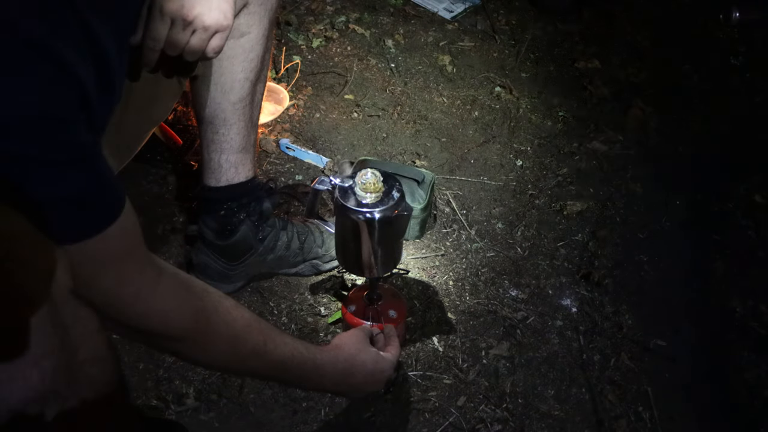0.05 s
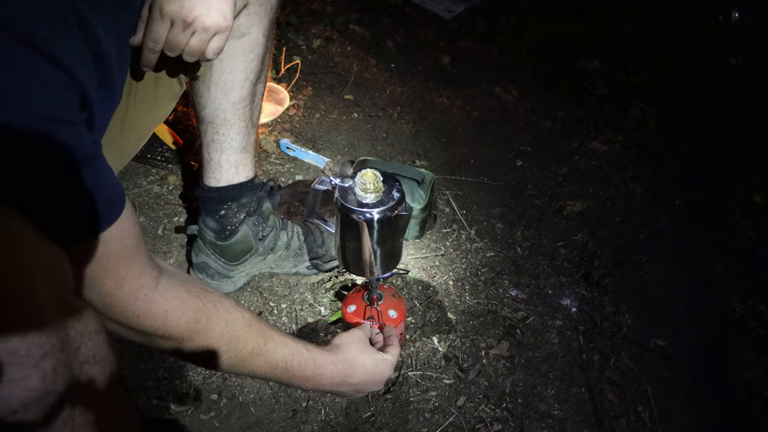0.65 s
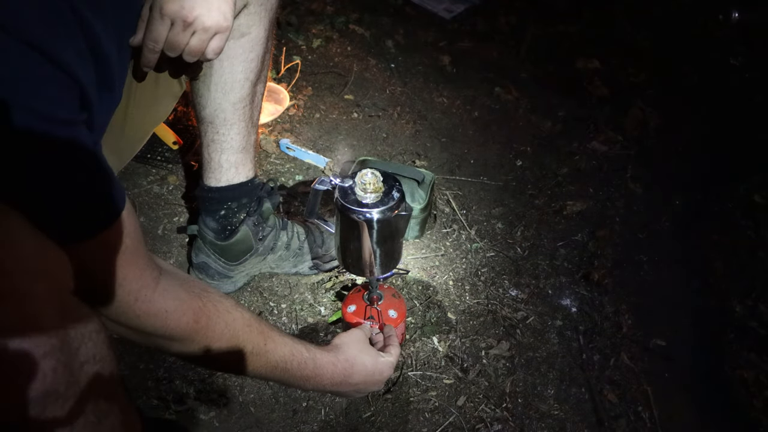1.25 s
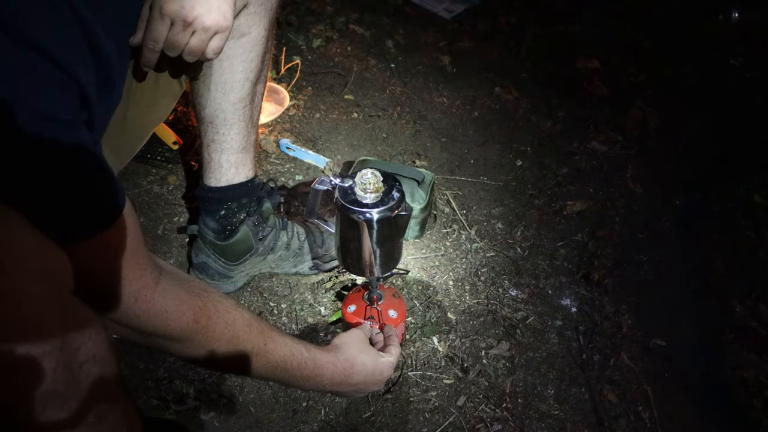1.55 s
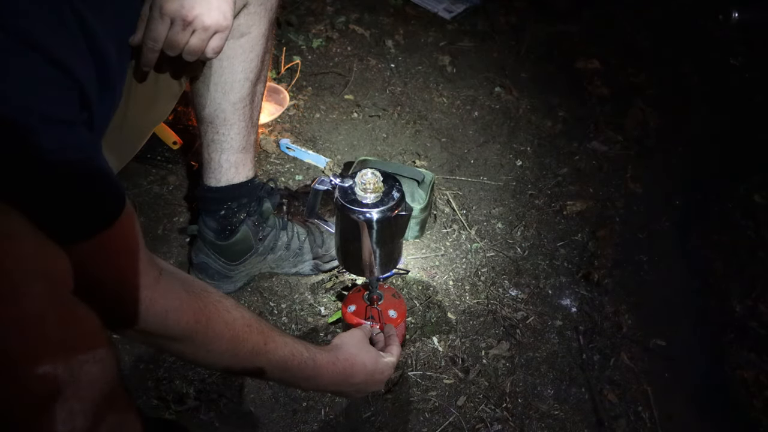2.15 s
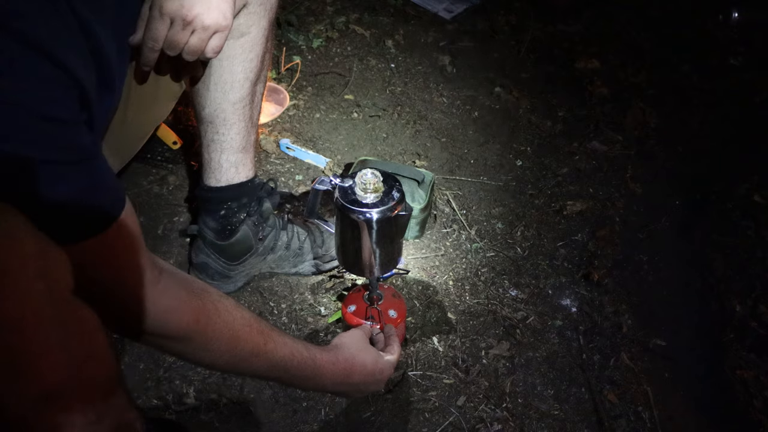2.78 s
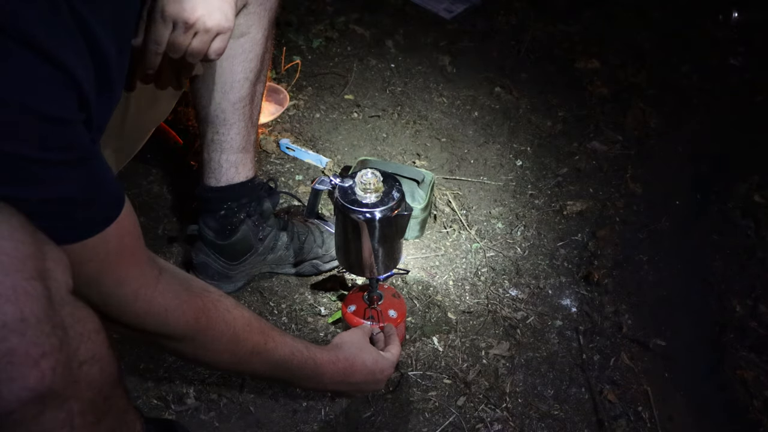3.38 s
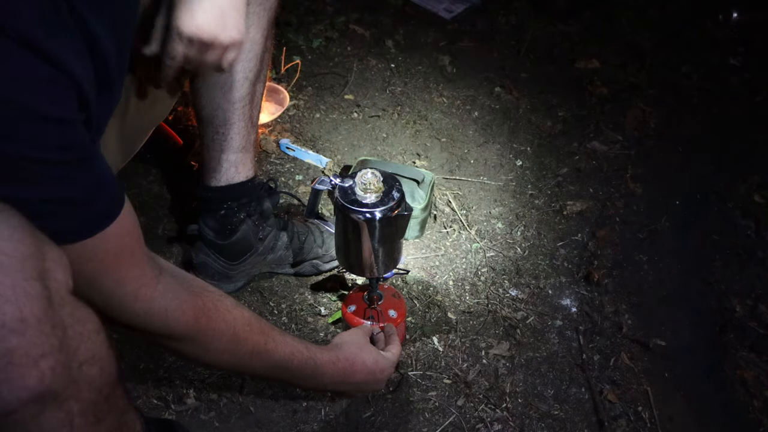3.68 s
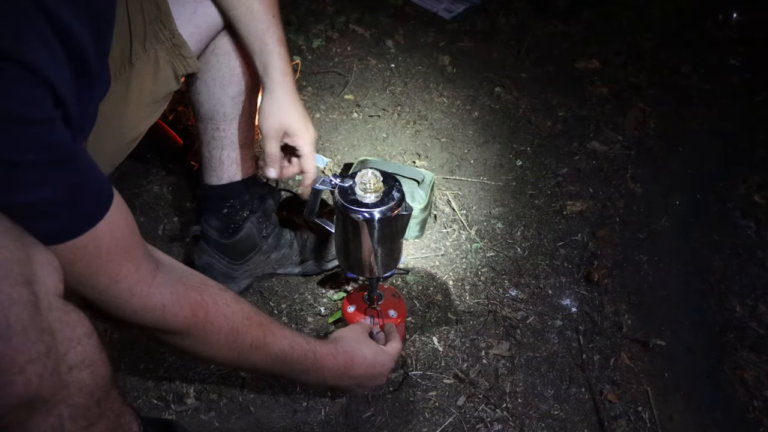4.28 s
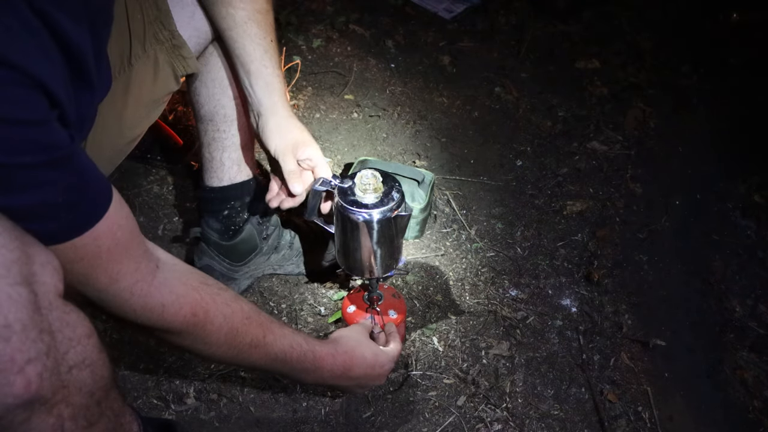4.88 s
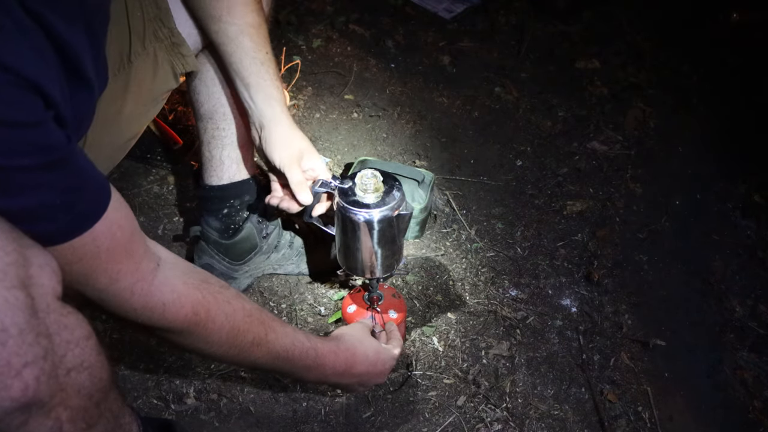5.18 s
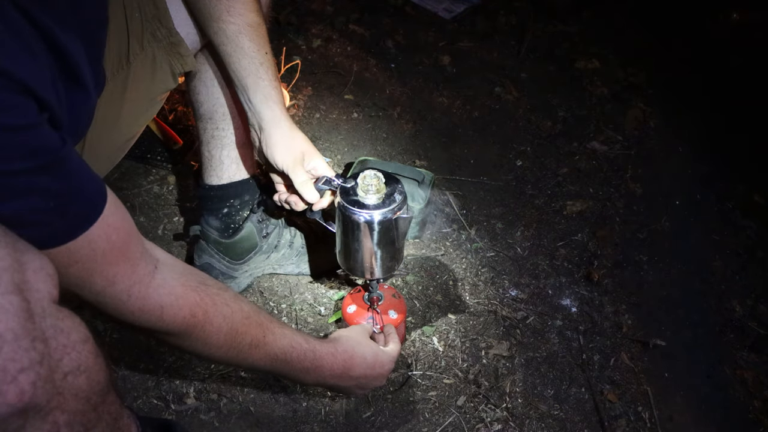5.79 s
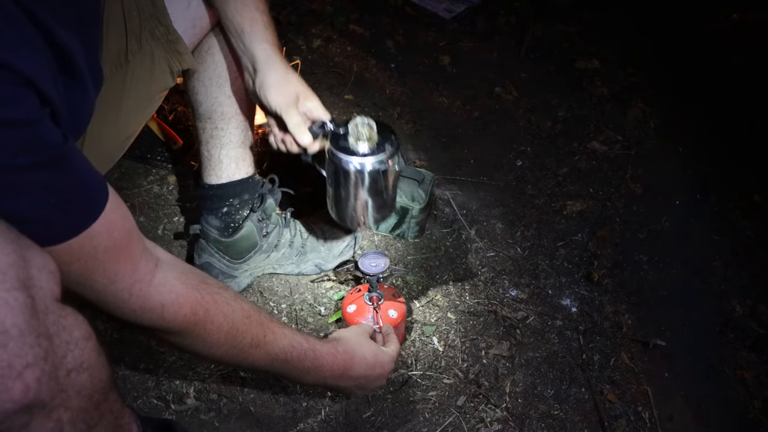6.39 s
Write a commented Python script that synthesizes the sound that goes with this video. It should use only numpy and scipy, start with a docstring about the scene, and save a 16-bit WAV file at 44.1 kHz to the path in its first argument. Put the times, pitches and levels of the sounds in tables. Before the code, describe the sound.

Coffee gurgles and thumps in a steel pot outdoors at night, among crickets and snapping firewood, ending with handle clinks and a scrape.

```python
"""A steel coffee percolator boils on a small gas stove, about a metre away, outdoors at night.
Collapsing steam bubbles excite the pot and thump over a low seething; a hand takes the handle,
which clinks in its own modes, and lifts the pot off the burner with a knock and a scrape.
To the right, wood bursts in a campfire with sharp snaps. All around, crickets trill by
stridulation, one note to a wing stroke, and bush crickets buzz high in the trees."""
import sys
import numpy as np
from scipy import signal
from scipy.fft import rfft, irfft
from scipy.io import wavfile
from scipy.ndimage import uniform_filter1d

SR = 44100
rng = np.random.default_rng(int(sys.argv[2]) if len(sys.argv) > 2 else 0)


def store_wav(level_fs):
    """Save 16-bit WAV to argv[1]."""
    pcm = np.round(np.clip(np.atleast_2d(level_fs), -1, 1) * 32767)
    wavfile.write(sys.argv[1], SR, pcm.T.astype(np.int16))


N = 292824
TIME = np.arange(N) / SR


# strength of the boil, which dies down as the pot leaves the flame: t/s, relative level/dB
BOIL_STRENGTH = [(0, 1), (.55, 4.5), (.85, 6), (1.1, 2), (1.65, -2.5), (1.85, 6), (2.05, -2), (2.3, 4.5),
                 (2.65, -2), (3.2, 7), (3.5, -1.5), (3.7, 7), (4.1, 2), (4.5, 2), (4.75, -1.5), (5.5, -1),
                 (6.15, -11), (6.4, -7.5)]
# frequency response of the pot and its water: f/Hz, gain/dB
POT_RESPONSE = [(22, -64), (60, -16), (130, -2.5), (320, -2.5), (430, -4), (540, 4.5), (680, 0.5),
                (790, -6.5), (950, -15.5), (1250, -17.5), (1600, -45), (3000, -60)]
# spectrum of the seething water and the burner flame: f/Hz, level/dB
RUMBLE_SPECTRUM = [(20, -50), (32, -36), (50, -14), (80, -6), (115, -3), (170, -2.5), (280, -7.5),
                   (500, -12.5), (900, -22), (1600, -27.5), (4000, -48)]
def percolator(small_db=-44, rumble_db=-47, calm=0.38, heave_db=2):
    """Impulse excitation: under the thumps, clusters of tiny bubbles kick the pot over a low rumble."""
    thumps = big_bubbles() + lesser_bubbles()
    kicks = impulses(per_second=240, scatter_db=4.5)
    # each thump stirs up tiny bubbles around it, and the whole water heaves with them
    stir = np.sqrt(calm + unit(uniform_filter1d(np.abs(thumps), SR // 25)).clip(0, 1))
    heave = stir * undb(heave_db * walk(24).clip(-2, 1.5))
    boil_db = curve(BOIL_STRENGTH)
    small = unit(colour(kicks * heave, POT_RESPONSE)) * undb(boil_db + small_db)
    rumble = unit(colour(rng.standard_normal(N) * heave, RUMBLE_SPECTRUM))
    rumble *= undb(0.081 * boil_db + rumble_db)
    return woods(thumps + small + rumble + spurts(), t60=0.039, wet_db=-18) * pan(-0.75)


def thump(hz, swell_s=0.0073, rebound_s=0.00552, slosh_s=0.0057):
    """Bubble collapse: a steam bubble swells, caves in and rebounds once; stirred water rings the pot."""
    t = np.arange(SR // 25) / SR
    age = t / (swell_s * rng.uniform(0.72, 1.216))
    swell = np.abs(np.sin(np.pi * np.minimum(age, 1))) ** 1.48
    angle = 2 * np.pi * (hz * t + rng.random())
    octave = undb(-29 + 4.7 * rng.standard_normal()) * np.cos(2 * angle)  # a hard collapse is lopsided
    collapse = swell * (np.sin(angle) + octave)
    delay_s = rebound_s * rng.uniform(0.865, 1.243)
    rebound = np.interp(t - delay_s, t, collapse) * undb(-11 + 2.9 * rng.standard_normal())
    slosh = noise(len(t), POT_RESPONSE) * np.minimum(2 * age, 1) * np.exp(-t / slosh_s)
    return collapse + rebound + undb(-21) * slosh


# collapses of big steam bubbles: t/s, peak level/dB
COLLAPSES = [(0.095, -21.5), (0.1213, -20.5), (0.1816, -16.5), (0.2597, -19.5), (0.2681, -24),
             (0.2838, -16.5), (0.3937, -15.5), (0.4099, -27), (0.4213, -24.5), (0.4463, -25), (0.4568, -28),
             (0.4679, -17), (0.5318, -27.5), (0.5573, -23), (0.6164, -26), (0.636, -18.5), (0.7188, -16),
             (0.7605, -20.5), (0.7765, -19.5), (0.7856, -22), (0.8216, -26), (0.9652, -22), (1.0821, -22),
             (1.1406, -24.5), (1.177, -25.5), (1.2101, -26.5), (1.4799, -21.0), (1.7277, -27.5),
             (1.7506, -19.5), (1.7991, -29.5), (1.9613, -26.5), (2.0009, -28.5), (2.146, -26),
             (2.2241, -23.5), (2.2528, -19.5), (2.2935, -19.5), (2.3851, -19.0), (2.3938, -21),
             (2.4902, -21.5), (2.532, -25), (2.5403, -24.5), (2.5658, -19), (2.5748, -23), (2.7336, -23.0),
             (2.7508, -26), (2.7583, -22), (2.766, -27), (2.7848, -21), (2.8122, -22), (2.8566, -25),
             (2.9352, -17.5), (2.9757, -16.0), (2.9954, -16), (3.0019, -28), (3.0164, -16), (3.0459, -15),
             (3.0552, -13.5), (3.0666, -21), (3.1297, -28), (3.1435, -25.5), (3.1915, -14), (3.2018, -26),
             (3.2238, -18.5), (3.2848, -20), (3.299, -26), (3.318, -27.5), (3.394, -25.0), (3.4523, -25),
             (3.4775, -23), (3.575, -27.5), (3.5829, -22.5), (3.5952, -17.5), (3.6096, -23), (3.6512, -29),
             (3.6627, -24), (3.6724, -20), (3.6931, -27.5), (3.7697, -26), (3.783, -22), (3.8644, -27.5),
             (3.883, -23.5), (3.9049, -17), (3.9172, -19.5), (3.927, -14.5), (3.9477, -17), (3.9807, -23.5),
             (4.162, -27.5), (4.1955, -26.5), (4.2557, -25.5), (4.2979, -25.5), (4.3096, -24),
             (4.4379, -22.5), (4.4852, -24), (4.5401, -25), (4.5854, -21.5), (4.6411, -23), (4.6534, -23.5),
             (4.669, -22.5), (4.6919, -22), (4.7011, -24), (4.7977, -24), (4.8161, -22), (4.842, -22.5),
             (4.9257, -25), (4.9347, -21.5), (4.9987, -26), (5.026, -22.5), (5.2545, -29.5), (5.4837, -26),
             (5.5052, -23), (5.6362, -24.5), (5.655, -31.5), (5.805, -26.5), (5.8392, -28), (6.0199, -29),
             (6.3628, -31.0), (6.3732, -29), (6.475, -25.5), (6.5097, -29)]
def big_bubbles(hz_at_0_db=668.5, hz_per_db=3, pitch_scatter=0.058):
    """Damped oscillation: each big bubble lasts a few cycles; a harder collapse sounds a little higher."""
    out = np.zeros(N)
    for s, db in COLLAPSES:
        hz = (hz_at_0_db + hz_per_db * db) * (1 + pitch_scatter * rng.standard_normal())
        add(out, s, undb(db) * thump(hz))
    return out


def lesser_bubbles(count=250, level_db=-34, scatter_db=2.5, centre_hz=535, spread_octaves=0.36):
    """Random superposition: bubbles of many sizes merge into a gurgle, stronger in a harder boil."""
    out = np.zeros(N)
    for when, strength, pitch in rng.uniform(-1, 1, (count, 3)):
        bubble = thump(centre_hz * 2 ** (spread_octaves * pitch))
        add(out, (when + 1) / 2 * TIME[-1], undb(level_db + scatter_db * strength) * bubble)
    return out * undb(0.6 * curve(BOIL_STRENGTH))


# spurts of coffee up the stem: t/s, duration/s, level/dB
STEM_SPURTS = [(0.354, 0.093, -47.5), (0.608, 0.038, -40.5), (1.741, 0.048, -40), (2.206, 0.052, -44),
               (3.605, 0.055, -40), (3.725, 0.08, -43.5)]
# spectrum of the splash under the lid: f/Hz, level/dB
SPLASH_SPECTRUM = [(400, -11), (800, 2.5), (1150, 0.5), (1400, -4), (1800, -28), (3500, -35)]
def spurts():
    """Shot noise: each spurt swells and sinks as a shower of small drops under the lid."""
    flow = np.zeros(N)
    for s, length, db in STEM_SPURTS:
        progress = np.clip((TIME - s) / length, 0, 1)
        flow += undb(db) * np.sqrt(np.sin(np.pi * progress).clip(0))
    drops = impulses(per_second=900, scatter_db=4)
    return flow * unit(colour(drops, SPLASH_SPECTRUM))


# knocks of the handle on its rivets: t/s, relative level/dB, damping by the hand/(1/s)
RIVET_KNOCKS = [(5.268, -28, 2), (5.297, -35.5, 30), (5.507, -39, 150), (5.6587, -27.5, 200)]
# modes of the handle: f/Hz, level/dB, T60/s
HANDLE_MODES = [(1270, -17, 0.017), (1710, -11, 0.018), (2320, 5, 0.014), (2950, -1, 0.015),
                (3300, 7, 0.024), (3630, 9, 0.03), (4470, 0, 0.018), (5500, 2, 0.019), (6200, -4, 0.022),
                (7140, -7, 0.19), (7350, -9.5, 0.13)]
def handle(level_db=-2, clack_s=0.0043):
    """Modal ringing: each knock gives a rough clack and excites the handle's modes; the hand damps them."""
    t = np.arange(SR // 5) / SR
    clack_spectrum = [(200, -6), (900, 5.5), (3500, -3), (9000, -4.5), (16000, -19)]
    out = np.zeros(N)
    for s, db, damping in RIVET_KNOCKS:
        ring = np.zeros(len(t))
        for hz, mode_db, t60 in HANDLE_MODES:
            gain = undb(mode_db + 2 * rng.standard_normal())
            decay = np.exp(-(np.log(1000) / t60 + damping) * t)
            ring += gain * np.sin(2 * np.pi * (hz * t + rng.random())) * decay
        clack = noise(len(t), clack_spectrum) * np.exp(-t / clack_s)
        add(out, s, undb(db + level_db) * (ring / 2 + undb(1) * clack))
    return woods(out, t60=0.13, wet_db=-3) * pan(-1.8)


# knocks of the pot on the burner: t/s, level/dB
BURNER_KNOCKS = [(6.27, -19), (6.273, -36), (6.2737, -41), (6.281, -40), (6.3093, -39)]
# response of the pot's base on the burner's prongs: f/Hz, gain/dB
PRONG_RESPONSE = [(40, -47), (200, -3.5), (700, 3.5), (1200, -0.5), (2600, -2), (3400, -5), (4600, -2),
                  (5800, -10), (8300, -7.5), (10000, -18), (15000, -30)]
def lift(rattle_db=-22, rattle_s=0.00078, scrape_db=-34, scrape_s=0.034):
    """Impact and friction: the base knocks on the burner's prongs, chatters and grates off them."""
    t = np.arange(-SR // 500, SR // 6) / SR
    out = np.zeros(N)
    for s, db in BURNER_KNOCKS:
        rattle = undb(rattle_db) * die_away(t, rattle_s) * rng.standard_normal(len(t))
        knock = colour((t == 0) + rattle, PRONG_RESPONSE)
        add(out, s + t[0], undb(db) * unit_burst(knock))
    grit = unit(undb(5 * walk(404).clip(-2, 2)))[:len(t)]
    friction = undb(scrape_db) * grit * die_away(t, scrape_s)
    add(out, BURNER_KNOCKS[0][0] + t[0], friction * noise(len(t), PRONG_RESPONSE))
    return woods(out, t60=0.045, wet_db=-4.5) * pan(-2.9)


# snaps of burning wood: t/s, level/dB, treble tilt/(dB per octave)
WOOD_SNAPS = [(0.801, -35, 3), (0.862, -31, 5), (1.188, -37, -4), (1.394, -31.5, 3), (1.97, -33, -4),
              (2.615, -32.5, 2), (2.882, -31.5, -5), (3.1714, -31.5, -11), (3.7472, -25.5, -2.5),
              (3.8572, -32, 1), (4.318, -19, 4), (4.574, -34, -1.5), (4.81, -23, 1.5), (4.9773, -28.5, 1),
              (5.4554, -36, 1), (5.601, -18.5, 1.5), (6.5074, -33.5, 0), (6.5305, -30.5, 3.5),
              (6.6031, -31.5, 0.5)]
def campfire(splinter_db=-17, splinter_s=0.0014, left_lag_s=0.00019, bounce_s=0.0018):
    """Brittle fracture: wood cracks and splinters briefly, heard first and louder on the right."""
    t = np.arange(-SR // 500, SR // 50) / SR
    splinters = undb(splinter_db) * die_away(t, splinter_s)
    hz = np.array([40, 200, 600, 1300, 2500, 4500, 7000, 13000, 17000])
    wood_db = np.array([-45, -4, -5.5, -0.5, 8.5, 0, 5.5, 3, -9.5])
    octaves = np.log2(np.maximum(hz, 1300) / 6000)
    out = np.zeros((2, N))
    for s, db, tilt in WOOD_SNAPS:
        bass_db = -0.5 * (db + 24) * (hz < 1000)  # a louder snap has a smaller share of bass
        spectrum = np.transpose([hz, wood_db + tilt * octaves + bass_db])
        crack = (t == 0) + splinters * rng.standard_normal(len(t))
        burst = undb(db) * unit_burst(colour(crack, spectrum))
        add(out[0], s + t[0] + left_lag_s, burst)
        add(out[1], s + t[0], burst)
        add(out, s + t[0] + bounce_s, undb(-16) * burst)  # reflection off the ground
    return woods(out * pan(-7), t60=0.13, wet_db=-12)


def embers(level_db=-58, per_second=7, scatter_db=4):
    """Poisson process: the glowing wood ticks faintly at independent, random instants."""
    ticks = (rng.random(N) < per_second / SR) * undb(scatter_db * rng.standard_normal(N).clip(-2, 1.2))
    ticks = colour(ticks, [(400, -31), (2200, 17.5), (7000, 12), (15000, -4)])
    return unit(woods(ticks, t60=0.012, wet_db=0)) * undb(level_db) * pan(-4)


def cricket(hz, stroke_hz, fall, duty, wander, rasp):
    """Stridulation: each wing stroke sings one short note that sinks in pitch as the wing slows."""
    cycle = (np.cumsum(stroke_hz * (1 + wander * walk(30))) / SR + rng.random()) % 1
    stroke = np.minimum(cycle / duty, 1)
    pitch = hz * (1 + fall * (0.5 - stroke) + rasp * walk(110))
    force = undb(1.7 * walk(22))
    return unit(force * np.sin(np.pi * stroke) * tone(pitch))


def tree_crickets(near_db=-44.5, far_db=-47.5):
    """Direct and diffuse sound: two singers out of step close on the right, a lower group blurred afar."""
    singer = cricket(2302, stroke_hz=33.3, fall=0.07, duty=0.8, wander=0.05, rasp=0.013)
    neighbour = cricket(2285, stroke_hz=39, fall=0.05, duty=0.8, wander=0.1496, rasp=0.01594)
    near = woods(singer + undb(-7) * neighbour, t60=0.61, wet_db=-6)
    near[0] = np.roll(near[0], int(0.00014 * SR))  # their sound reaches the left side later
    group = sum(cricket(1915 * detune, rng.uniform(28, 52), fall=0.06, duty=0.7, wander=0.2, rasp=0.021)
                for detune in (0.97, 1, 1.03))
    far = woods(group, t60=0.5, wet_db=8)
    return unit(near) * undb(near_db) * pan(-9.5) + unit(far) * undb(far_db) * pan(-1.5)


# trills of the field crickets: start t/s, end t/s, f/Hz, relative level/dB, left minus right/dB
TRILL_BOUTS = [(0.206, 0.677, 4102, -49, -4.5), (0.256, 1.126, 3858, -51.5, 0),
               (1.345, 1.94, 3898, -52.5, 3.5), (2.44, 3.075, 3800, -49.5, -0.5),
               (3.37, 3.952, 3843, -53, 0), (3.546, 4.28, 4080, -49.5, -3.5), (4.898, 5.408, 3920, -56, 1),
               (5.714, 6.495, 3890, -52, 0), (6.0, 6.36, 4200, -55.5, 0)]
def field_crickets(level_db=-1, far_db=-60, fade_s=0.1, note_gain=0.3):
    """Amplitude modulation: trills pulse over a clear held note; they come and go, a far one never rests."""
    out = cricket(3850, stroke_hz=34, fall=0.09, duty=0.8, wander=0.14, rasp=0.01606) * undb(far_db)
    for start, end, hz, db, left_db in TRILL_BOUTS:
        gate = np.clip(np.minimum(TIME - start, end - TIME) / fade_s + 0.3, 0, 1)
        strokes = cricket(hz, stroke_hz=36.2, fall=0.08, duty=0.79, wander=0.0785, rasp=0.012)
        note = unit(tone(hz * (1 + 0.00406 * walk(60))))
        out = out + unit(strokes + note_gain * note) * gate * undb(db) * pan(left_db)
    return woods(out * undb(level_db), t60=0.61, wet_db=6)


# spectrum of the far insects: f/Hz, level/dB
CHORUS_SPECTRUM = [(500, -7), (1000, 2), (1600, -2), (2100, 6.5), (2600, 2), (3200, 4), (4200, 5),
                   (4750, 11.5), (5400, 1), (6050, 2.5), (6800, -66), (8500, -41), (11000, -27),
                   (16000, -60)]
def insect_chorus(level_db=-47):
    """Incoherent summation: countless far insects blur into a hiss, partly shared by the two sides."""
    voices = rng.standard_normal((2, N)) + 0.48 * rng.standard_normal(N)
    return unit(colour(voices, CHORUS_SPECTRUM)) * undb(level_db + 0.8 * walk(6.3)) * pan(-0.54)


# spectrum of the bush crickets: f/Hz, level/dB
BUZZ_SPECTRUM = [(7000, -12), (9500, -8.5), (10700, -1), (11900, 6), (12800, 3), (14000, -4.5),
                 (15000, -12), (16500, -31)]
# slow swell of their buzz: t/s, relative level/dB
BUZZ_SWELL = [(0, -45.5), (0.25, -45), (0.65, -45), (1.25, -41.5), (2.5, -42.5), (4.1, -42), (4.8, -45.5),
              (5.5, -42), (6.64, -42.5)]
def bush_crickets(gain_db=2, rasp_db=1.1):
    """Modulated noise: a high band whose level flickers quickly is heard as a rasping buzz."""
    buzz = noise((2, N), BUZZ_SPECTRUM) * undb(rasp_db * walk(160) + 0.88 * walk(18))
    return buzz * undb(curve(BUZZ_SWELL) + gain_db) * pan(-1)


def woods(x, t60, wet_db):
    """Scattering: ground and trunks add an exponentially fading tail, different on each side."""
    t = np.arange(SR // 2) / SR
    tail = rng.standard_normal((2, len(t))) * np.exp(-np.log(1000) * t / t60)
    tail /= np.sqrt(np.sum(tail ** 2, axis=1, keepdims=True))
    return x + undb(wet_db) * signal.fftconvolve(np.atleast_2d(x), tail, axes=1)[:, :N]


def undb(db):
    """Decibels to amplitude ratio."""
    return 10 ** (np.asarray(db) / 20)


def unit(x):
    """Normalisation to rms 1."""
    return x / np.sqrt(np.mean(x ** 2))


def unit_burst(x):
    """Normalisation to the energy of 5 ms at rms 1."""
    return x * np.sqrt(SR / 200 / np.sum(x ** 2))


def die_away(t, decay_s):
    """Exponential decay after t = 0, silence before."""
    return (t > 0) * np.exp(-np.abs(t) / decay_s)


def curve(table):
    """Linear interpolation of (t/s, value) points."""
    return np.interp(TIME, *np.transpose(table))


def colour(x, points):
    """Filtering by a response of (f/Hz, gain/dB) points."""
    hz, db = np.transpose(points)
    f = np.maximum(np.fft.rfftfreq(x.shape[-1], 1 / SR), 1)
    return irfft(rfft(x) * undb(np.interp(np.log(f), np.log(hz), db)), x.shape[-1])


def noise(shape, spectrum):
    """Filtered Gaussian noise of rms 1."""
    return unit(colour(rng.standard_normal(shape), spectrum))


def tone(hz):
    """A sine whose phase is the integral of its frequency."""
    return np.sin(2 * np.pi * np.cumsum(hz) / SR)


def impulses(per_second, scatter_db):
    """A Poisson train of impulses, random in size and sign."""
    hits = rng.random(N) < per_second / SR
    return hits * undb(scatter_db * rng.standard_normal(N).clip(-2, 2)) * rng.choice([-1, 1], N)


def walk(rate):
    """Random fluctuation of rms 1, gliding to a new value every 1 / rate s."""
    hold = int(SR / rate)
    steps = np.repeat(rng.standard_normal(N // hold + 1), hold)
    return unit(uniform_filter1d(steps, hold)[:N])


def pan(db):
    """Gains for a level difference, left minus right."""
    return undb(np.array([[db], [-db]]) / 2)


def add(track, s, sound):
    """Superposition of a sound on a track at time s."""
    i = int(np.clip(s * SR, 0, N - 1))
    track[..., i:i + sound.shape[-1]] += sound[..., :N - i]


def scene():
    """Superposition: pot and fire close by, insects all around."""
    close = percolator() + handle() + lift() + campfire() + embers()
    return close + tree_crickets() + field_crickets() + insect_chorus() + bush_crickets()


def record(dry):
    """Clipping and band limiting: peaks stop at full scale, and a low-pass cuts above 16 kHz."""
    low_pass = signal.ellip(8, 0.2, 70, 16000, fs=SR, output="sos")
    return signal.sosfilt(low_pass, np.clip(dry, -1, 1))


dry = scene()
out = record(dry)
store_wav(out)
```